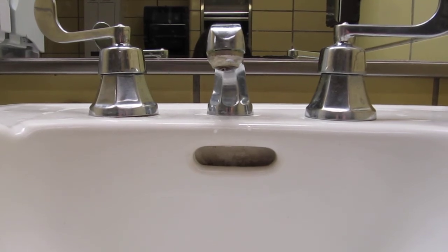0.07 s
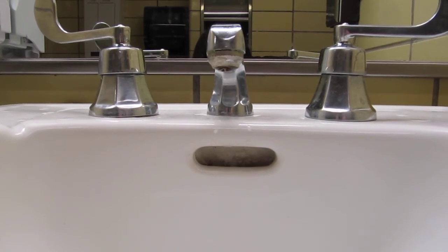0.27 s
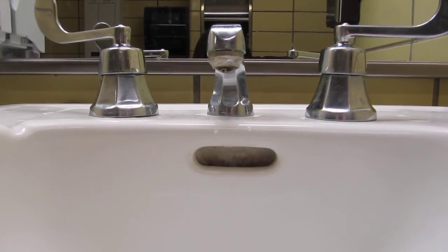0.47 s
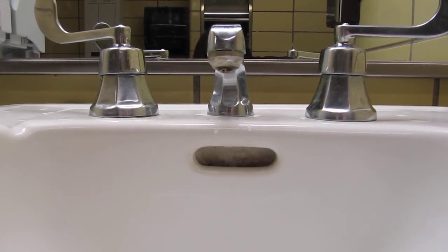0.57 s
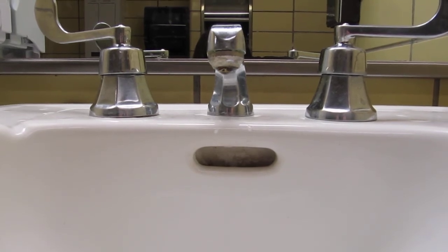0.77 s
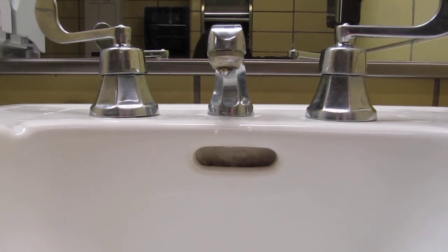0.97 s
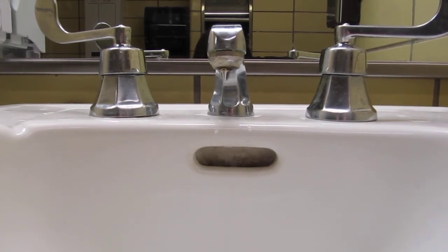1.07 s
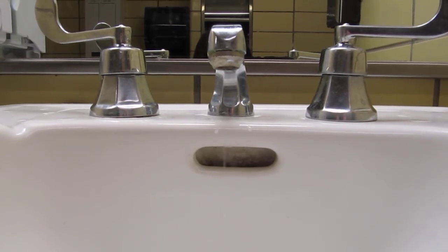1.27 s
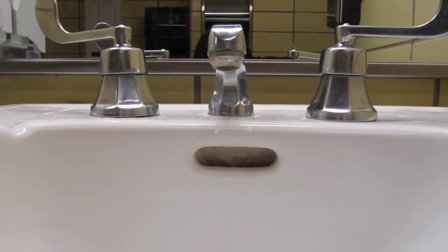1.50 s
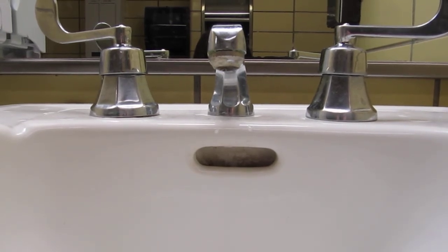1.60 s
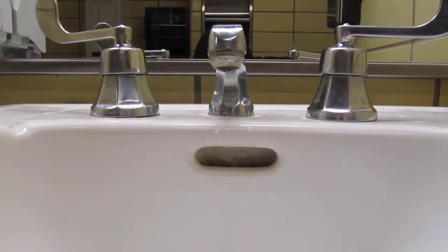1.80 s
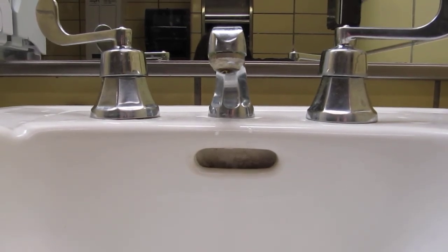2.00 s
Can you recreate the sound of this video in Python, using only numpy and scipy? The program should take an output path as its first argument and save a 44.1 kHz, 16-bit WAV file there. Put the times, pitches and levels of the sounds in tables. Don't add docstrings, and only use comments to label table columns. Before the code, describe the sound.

Two ringing water drops plink into a sink drain over low ventilation rumble and faint electrical hum

```python
import sys
import numpy as np
from scipy import signal
from scipy.fft import rfft, irfft
from scipy.io import wavfile

SR = 44100
rng = np.random.default_rng(int(sys.argv[2]) if len(sys.argv) > 2 else 0)


def generate_wav(sig):
    pcm = np.round(np.clip(np.atleast_2d(sig).T, -1, 1) * 32767).astype(np.int16)
    wavfile.write(sys.argv[1], SR, pcm)


def gain_from_db(level_db):
    decades = np.asarray(level_db, float) / 20
    return 10 ** decades


N = 90404
MAINS_HZ = 59.967

# start_s, bubble_hz, bubble_t60_s, pipe_hz, pipe_t60_s
DROPS = [
    (.2086, 1972, .081, 2008, .051),
    (.3620, 2170, .04, 2330, .03),
    (1.5206, 1929, .041, 1827, .044),
]
# bubble_db, pipe_db, mouth_db, basin_db
DROP_LEVELS = [
    (-14.5, -14, -8, -9),
    (-33, -37, -31, -31.5),
    (-9.5, -14, -15.5, -14),
]
# mode_hz, level_db, t60_s
BASIN_MODES = [(468, -36, 0.18), (685, -40.5, 0.16), (1184, -33, 0.061), (1541, -20, 0.056),
               (2862, -18.5, 0.054), (2924, -13.5, 0.036), (4147, -28, 0.028), (4880, -32.5, 0.045),
               (6474, -35, 0.049), (9840, -21, 0.022)]
# mode_hz, level_db, t60_s
PORCELAIN_MODES = [(2905, -44, .6), (2950, -41, .6), (3849, -43, .28), (4807, -50, .3)]
# start_s, peak_db
TICKS = [
    (1.6336, -37),
    (1.733, -40.5),
]
# centre_hz, width_hz, level_db
TICK_PEAKS = [(9530, 260, 2.5), (10640, 470, -4), (12800, 1800, -8), (14500, 1500, -25)]
# harmonic_number (multiple of mains), rms_db
HUM_LINES = [(2, -54), (3, -75), (4, -60), (5, -67), (6, -58), (8, -65), (12, -75), (14, -79), (15, -82)]
# pitch_hz, rms_db
WHINE_LINES = [(2278.7, -77), (7852.4, -75), (7882.1, -73)]
# frequency_hz, rms_db (per harmonic)
BUZZ_SPECTRUM = [(1000, -85.5), (3500, -91.5), (5200, -89), (5800, -93.5), (7000, -85), (7800, -93),
                 (8900, -84), (11000, -91)]
# harmonic_number (multiple of mains), rms_db
BUZZ_LINES = [(84, -77), (86, -80), (87, -82), (89, -83), (101, -84), (118, -81), (135, -82), (145, -80),
              (147, -80), (150, -80), (153, -85), (155, -83), (159, -79), (160, -76), (164, -76),
              (165, -75), (170, -84), (171, -82), (172, -73), (173, -78), (174, -85), (175, -84),
              (177, -84)]
# frequency_hz, density_db (per Hz)
RUMBLE_SPECTRUM = [(20, 9), (30, -7.5), (44, -8), (70, 0), (95, -16.5), (155, -11), (250, -19.5),
                   (1000, -28)]
# frequency_hz, density_db (per Hz)
HISS_SPECTRUM = [(1000, 2), (2240, -2), (3840, -6), (5700, -9), (8700, -6), (10300, -10), (11200, -13),
                 (16200, -21)]
# centre_hz, width_hz, rms_db
WHISTLES = [(8000, 240, -77), (8820, 280, -76), (9670, 160, -76.5), (10050, 57, -75.5)]


def rms_one(x):
    return x / np.sqrt(np.mean(x ** 2) + 1e-20)


def decay(t, t60_s, swell_s):
    t = np.maximum(t, 0)
    swell = 1 - np.exp(-(t / swell_s) ** 3)
    return swell * gain_from_db(-60 * t / t60_s)


def sine(hz):
    t = np.arange(N) / SR
    return np.sqrt(2) * np.sin(2 * np.pi * (hz * t + rng.random()))


def resonance(x, hz, width_hz):
    r = np.exp(-np.pi * width_hz / SR)
    zeros = np.array([1, 0, -1]) * (1 - r * r) / 2
    poles = [1, -2 * r * np.cos(2 * np.pi * hz / SR), r * r]
    return signal.lfilter(zeros, poles, x)


def resonant_noise(white, peaks):
    total = np.zeros(N)
    for hz, width_hz, level_db in peaks:
        band = resonance(resonance(white, hz, width_hz), hz, width_hz)
        total += gain_from_db(level_db) * rms_one(band)
    return total


def at_hz(points, hz):
    table_hz, table_db = np.array(points).T
    return np.interp(np.log(hz), np.log(table_hz), table_db)


def coloured(points):
    hz = np.maximum(np.arange(N // 2 + 1) * SR / N, 1)
    inside = (hz >= points[0][0]) & (hz < points[-1][0])
    spectrum = rfft(rng.standard_normal(N)) * gain_from_db(at_hz(points, hz)) * inside
    return rms_one(irfft(spectrum, N))


def mode(t, hz, t60_s, swell_s):
    return decay(t + 0.0012, t60_s, swell_s) * np.sin(2 * np.pi * hz * t)


def drain_air(t, drop, levels_db):
    _, bubble_hz, bubble_t60_s, pipe_hz, pipe_t60_s = drop
    bubble_db, pipe_db, mouth_db, _ = levels_db
    swell_s = 0.0011
    air = gain_from_db(bubble_db) * mode(t, bubble_hz, bubble_t60_s, swell_s)
    air += np.sign(pipe_hz - bubble_hz) * gain_from_db(pipe_db) * mode(t, pipe_hz, pipe_t60_s, swell_s)
    air -= gain_from_db(mouth_db) * mode(t, 2275, 0.015, swell_s)
    return signal.sosfilt(signal.butter(4, 1550, "high", fs=SR, output="sos"), air)


def basin_impact(t, spray_noise):
    ring = np.zeros(N)
    for hz, level_db, t60_s in [*BASIN_MODES, *PORCELAIN_MODES]:
        ring += gain_from_db(level_db) * mode(t, hz, t60_s, swell_s=0.002)
    crack = gain_from_db(-24) * decay(t + 0.0012, t60_s=0.027, swell_s=0.001)
    spray = gain_from_db(-46) * decay(t, t60_s=0.33, swell_s=0.0051)
    return ring + (crack + spray) * spray_noise


def drops():
    out = np.zeros(N)
    band = signal.butter(4, [3200, 10500], "band", fs=SR, output="sos")
    spray_noise = signal.sosfilt(band, rng.standard_normal(N))
    for drop, levels_db in zip(DROPS, DROP_LEVELS):
        t = np.arange(N) / SR - drop[0]
        out += drain_air(t, drop, levels_db)
        out += gain_from_db(levels_db[3]) * basin_impact(t, spray_noise)
    return out


def ticks():
    t = np.arange(N) / SR
    bright = rms_one(resonant_noise(rng.standard_normal(N), TICK_PEAKS))
    envelope = sum(gain_from_db(peak_db) * decay(t - start_s, t60_s=0.027, swell_s=0.0013)
                   for start_s, peak_db in TICKS)
    return bright * envelope


def room(x):
    t = np.arange(int(1.5 * SR)) / SR
    white = rng.standard_normal(len(t))
    low = signal.sosfilt(signal.butter(2, 5100, fs=SR, output="sos"), white)
    gap_s = 0.0048
    echo = low * decay(t, 1.8, gap_s) + (white - low) * decay(t, 1, gap_s)
    echo += gain_from_db(3) * white * decay(t, 0.12, gap_s)
    return signal.fftconvolve(x, echo / np.sqrt(np.sum(echo ** 2)))[:N]


def ventilation():
    swing = rms_one(resonance(rng.standard_normal(2 * N), 0.83, 8.3)[N:])
    rumble = gain_from_db(-50.5 + 2 * swing) * coloured(RUMBLE_SPECTRUM)
    hiss = gain_from_db(-62) * coloured(HISS_SPECTRUM)
    return rumble + hiss + resonant_noise(rng.standard_normal(N), WHISTLES)


def hum():
    out = np.zeros(N)
    for k, rms_db in HUM_LINES:
        hz = k * MAINS_HZ
        waver = rms_one(resonance(rng.standard_normal(2 * N), hz, 2.6)[N:])
        out += gain_from_db(rms_db) * (sine(hz) + 0.16 * waver)
    return out


def buzz():
    t, orders = np.arange(N) / SR, np.arange(17, 190)
    count = len(orders)
    spread_db = 3.5 * np.clip(rng.standard_normal(count), -3, 1.3)
    level_db = at_hz(BUZZ_SPECTRUM, orders * MAINS_HZ) + spread_db
    for k, rms_db in BUZZ_LINES:
        level_db[orders == k] = rms_db
    smear = 0.12
    delay = np.cumsum(rng.normal(0, smear, count))
    phase = np.cumsum(delay + rng.normal(0, smear, count))
    lines = np.sin(2 * np.pi * (np.outer(orders * MAINS_HZ, t) + phase[:, None]))
    return np.sqrt(2) * gain_from_db(level_db) @ lines


def whine():
    return sum(gain_from_db(rms_db) * sine(hz) for hz, rms_db in WHINE_LINES)


def scene():
    water = drops() + ticks()
    background = ventilation() + hum() + buzz() + whine()
    return (water + gain_from_db(-19.5) * room(water) + background)[None]


def top_cut(x):
    return signal.sosfilt(signal.butter(12, 15770, fs=SR, output="sos"), x)


def record(dry):
    low_pass = signal.ellip(12, 0.5, 70, 15760, fs=SR, output="sos")
    mix = signal.sosfilt(low_pass, dry)
    return top_cut(mix)


dry = scene()
out = record(dry)
generate_wav(out)
```